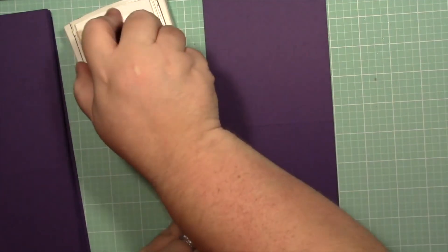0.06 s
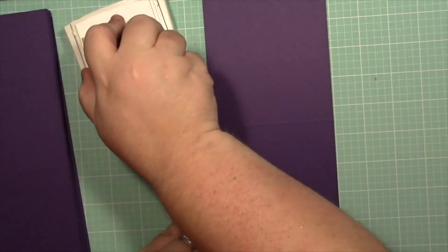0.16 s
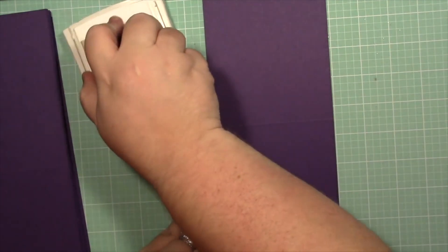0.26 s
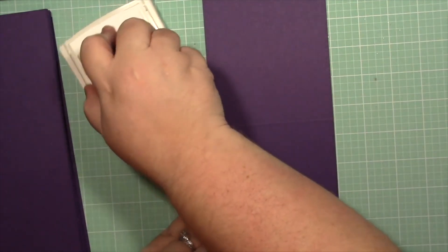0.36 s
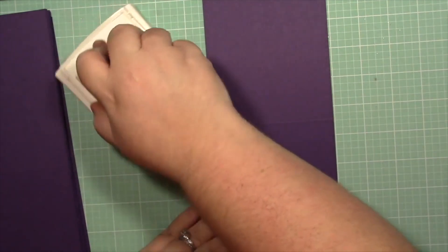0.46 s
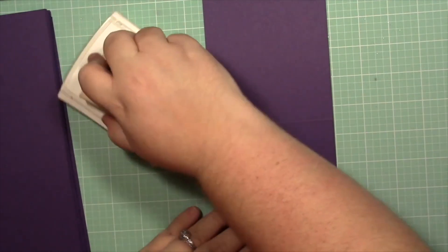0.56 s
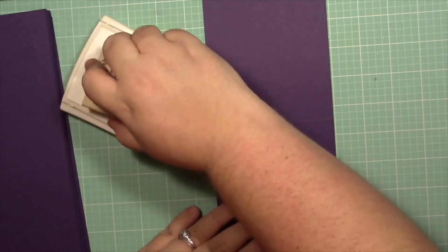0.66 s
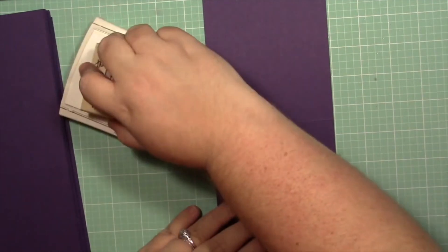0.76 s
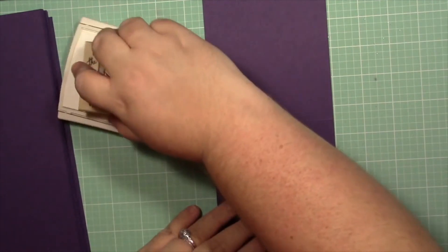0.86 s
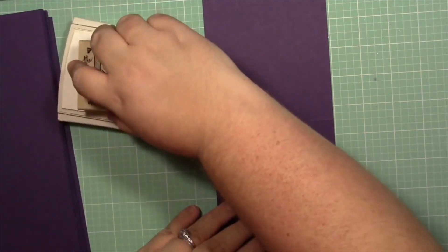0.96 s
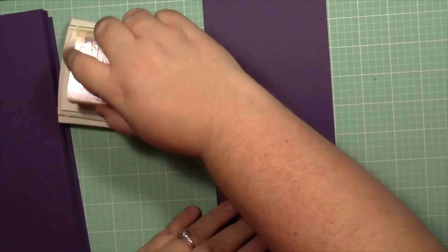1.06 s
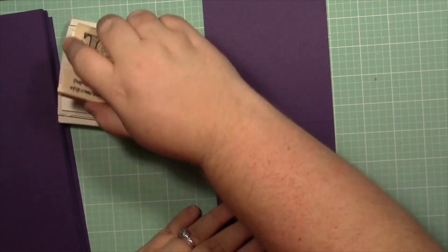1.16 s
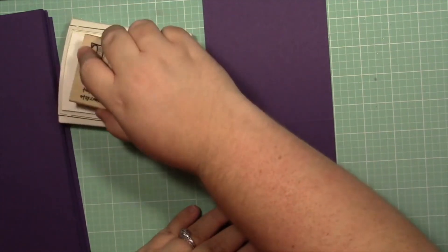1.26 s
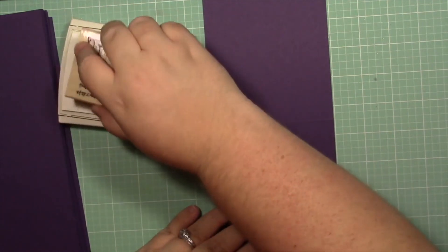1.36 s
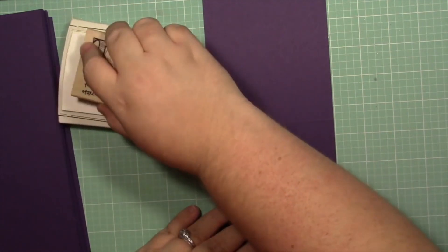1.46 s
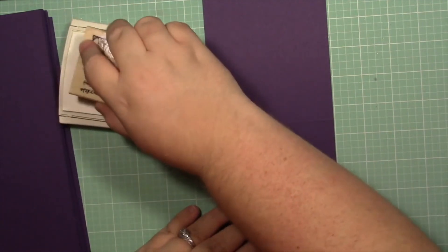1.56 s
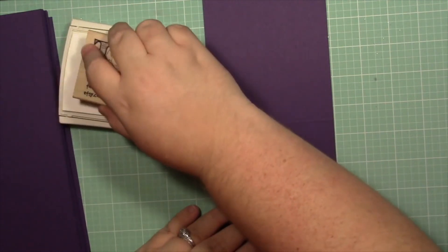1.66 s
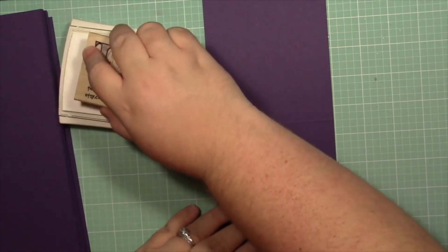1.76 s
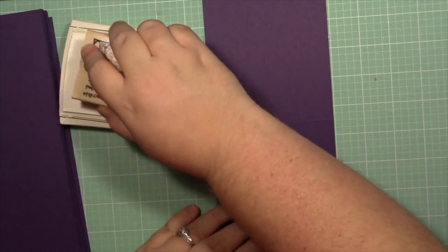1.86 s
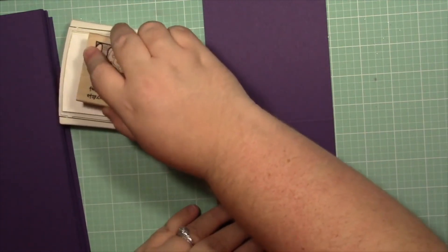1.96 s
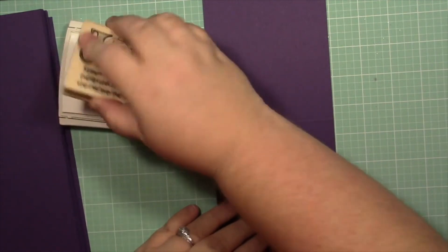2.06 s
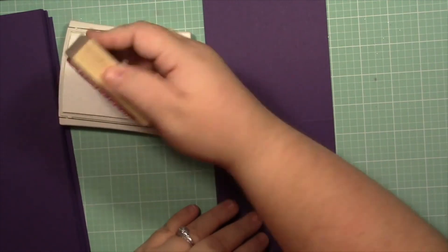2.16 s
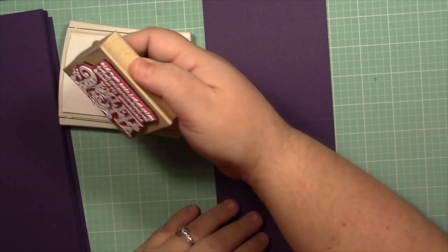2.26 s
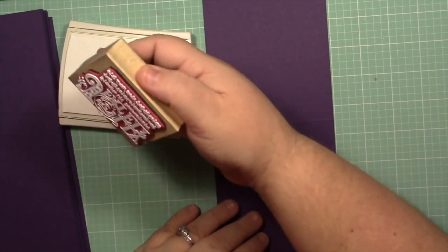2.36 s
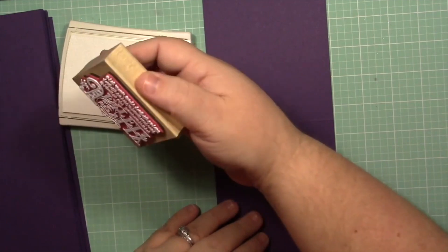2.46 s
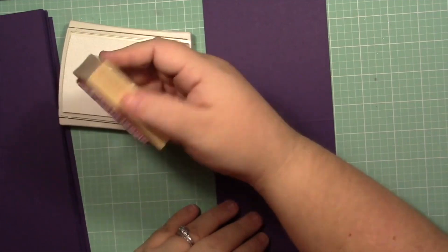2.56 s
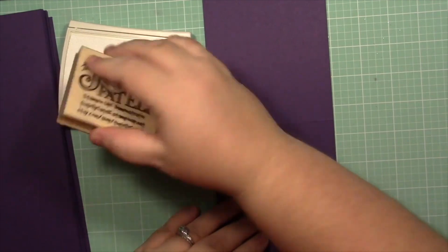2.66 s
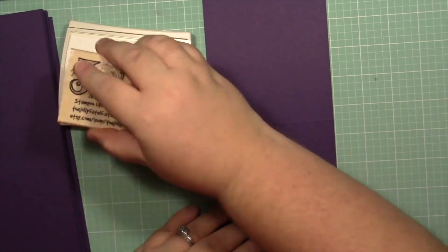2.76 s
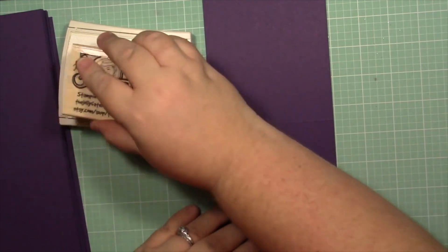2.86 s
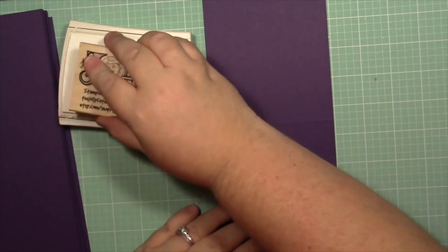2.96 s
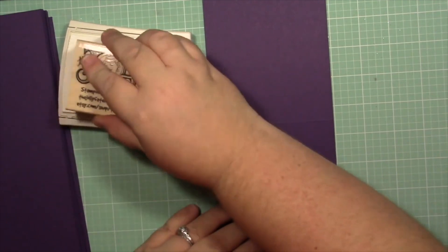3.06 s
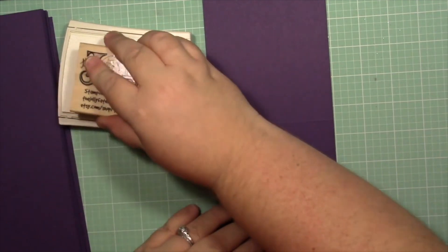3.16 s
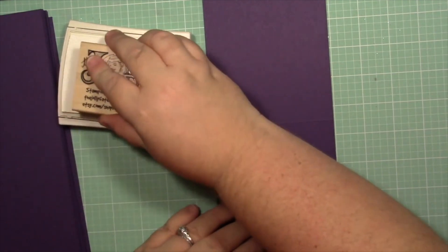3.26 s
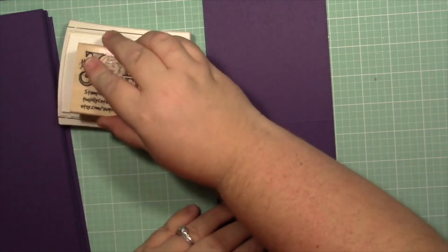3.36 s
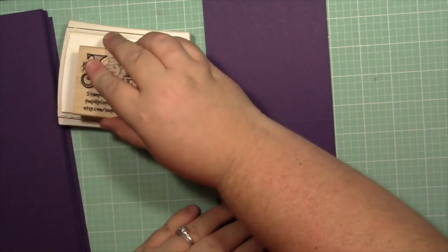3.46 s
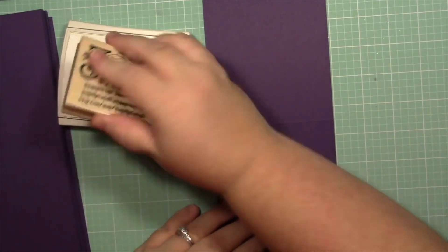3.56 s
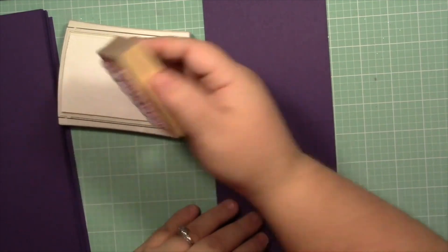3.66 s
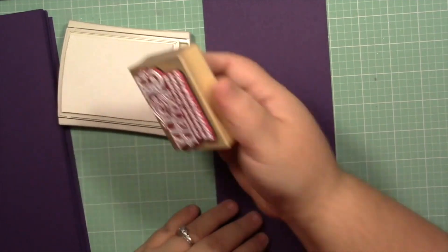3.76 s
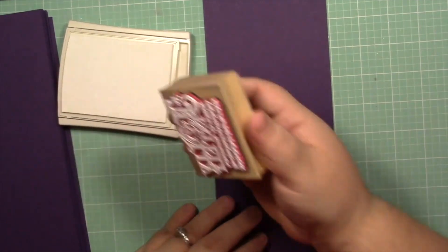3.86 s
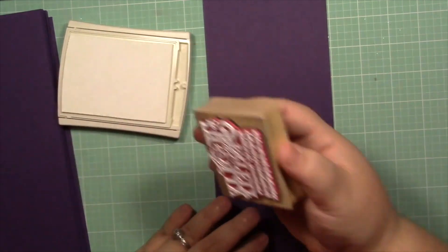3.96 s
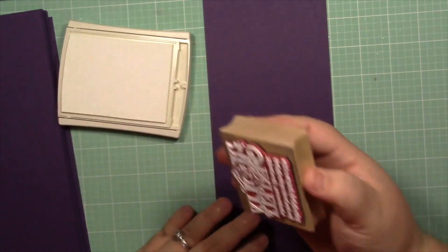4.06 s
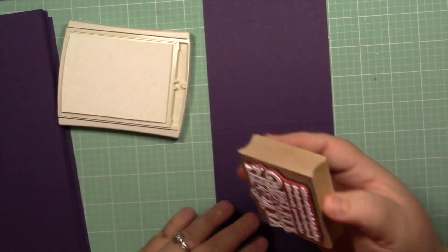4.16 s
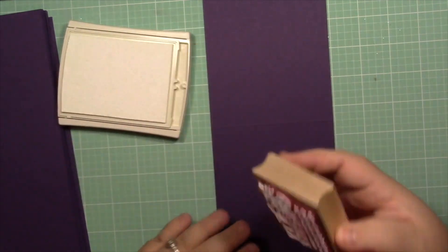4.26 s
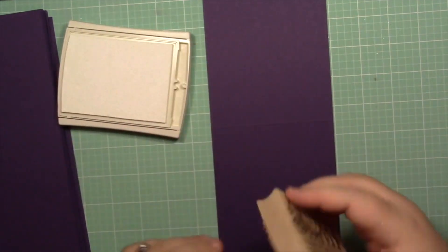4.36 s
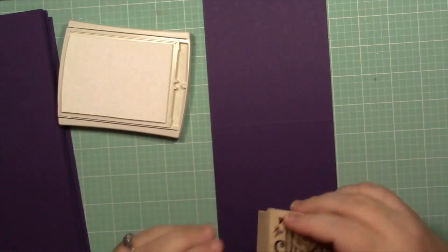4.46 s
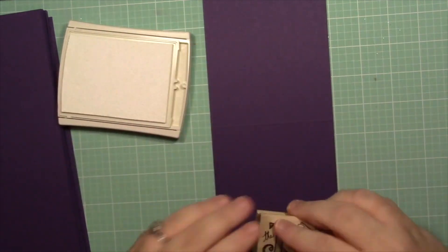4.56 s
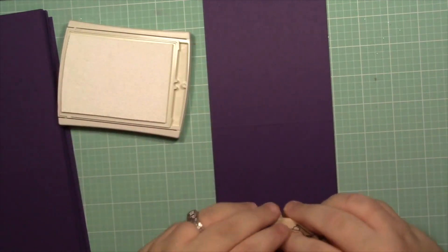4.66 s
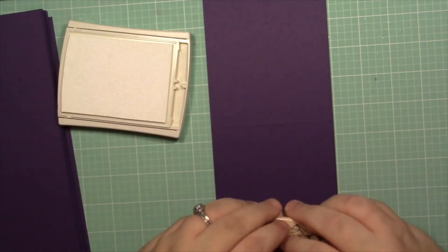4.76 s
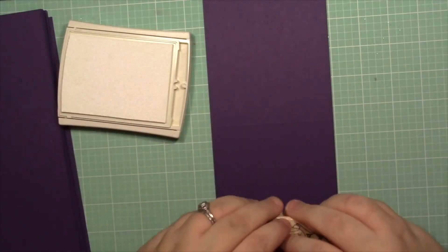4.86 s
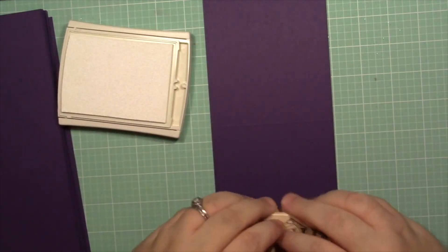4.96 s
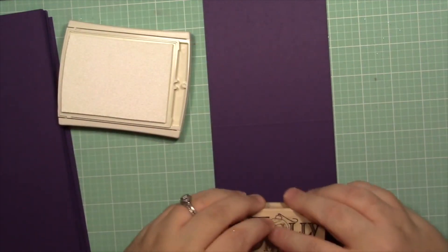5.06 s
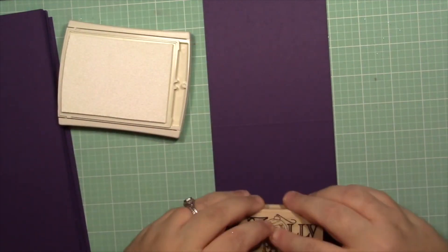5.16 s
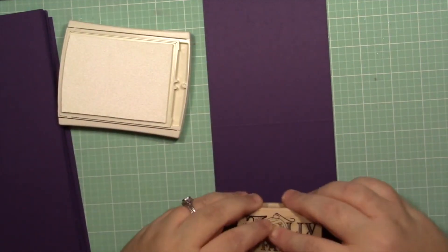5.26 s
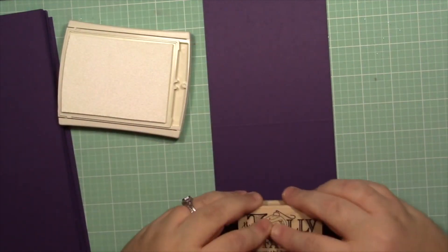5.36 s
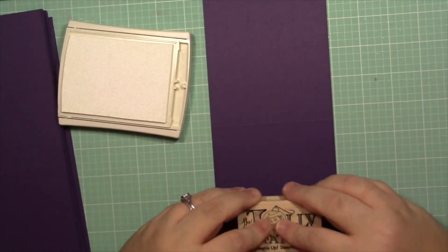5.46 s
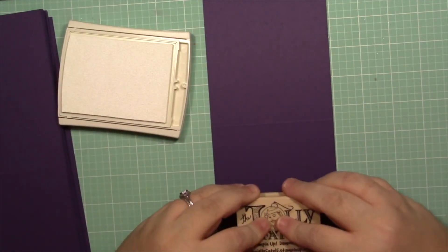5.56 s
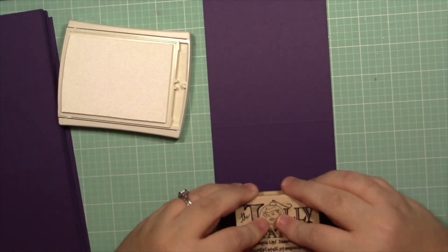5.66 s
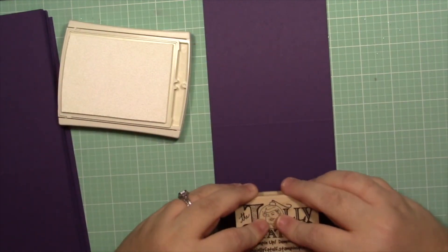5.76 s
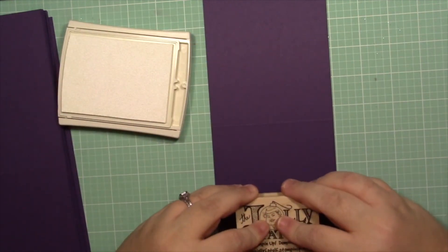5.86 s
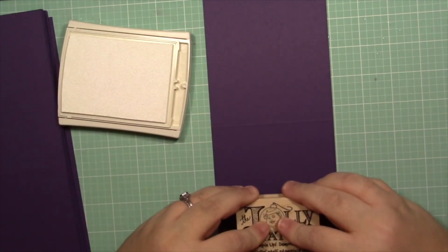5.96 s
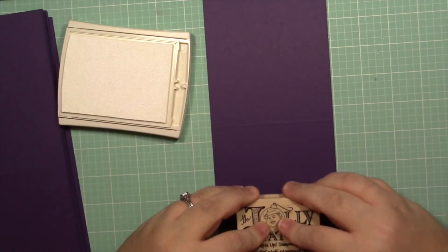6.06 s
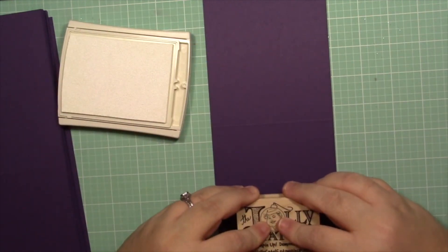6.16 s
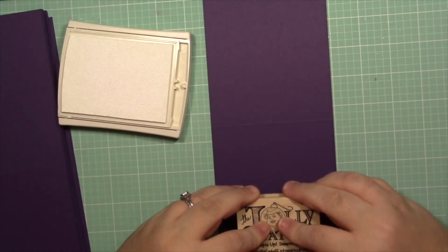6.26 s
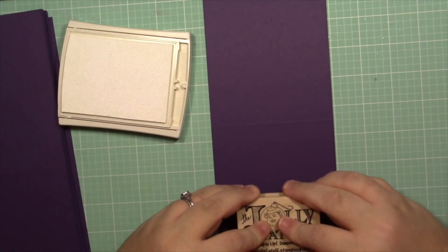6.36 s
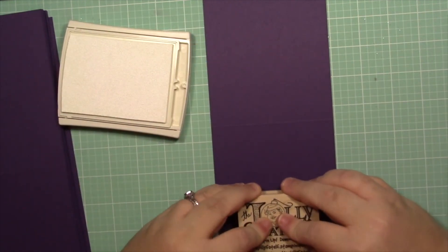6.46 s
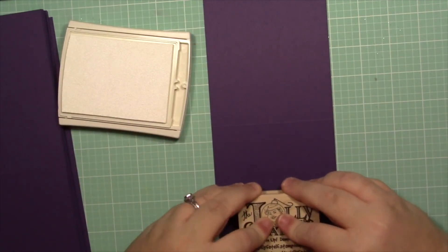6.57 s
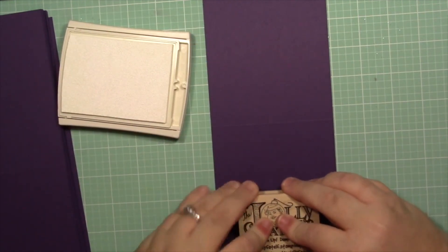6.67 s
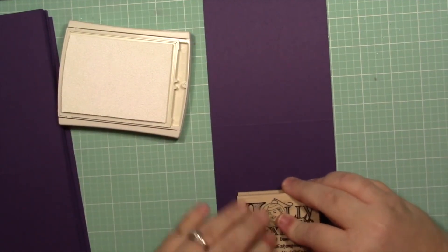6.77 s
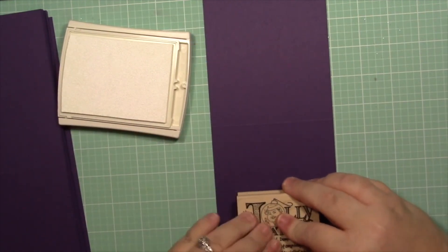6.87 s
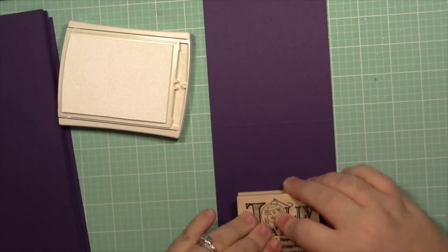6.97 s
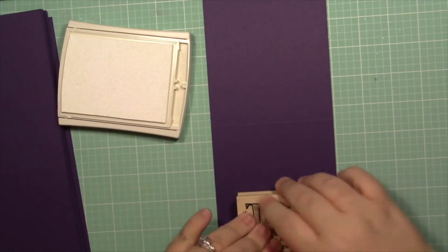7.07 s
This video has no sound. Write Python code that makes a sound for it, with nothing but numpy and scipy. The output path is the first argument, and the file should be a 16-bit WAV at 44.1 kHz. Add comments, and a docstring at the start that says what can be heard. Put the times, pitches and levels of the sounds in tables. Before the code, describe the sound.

Close above a craft table in a small room, a plastic case clacks down and scrapes along a mat. Two runs of hollow, clacking taps follow as a wooden stamp is inked on the pad. After a quieter stretch of hands rubbing card and tiny sticky snaps of rubber, the stamp knocks down solidly and rocks softly. Room tone, microphone hiss and a faint, rapid camera tick run underneath.

```python
"""A wood-mounted rubber stamp, tapped on a plastic ink pad in two bunches, then set down hard on card.
Close perspective, from a camera microphone straight above the table in a small room. Each knock rings
block, case and table, and the room answers. A low thud and a soft rush fade at the very start; the
pad's hollow case is set down and slid on the cutting mat. Later hands brush the card and the tacky
rubber crackles. Behind it all are the camera's faint ticking, room tone and microphone hiss."""
import sys
import numpy as np
from scipy import signal
from scipy.fft import rfft, irfft, next_fast_len
from scipy.io import wavfile
from scipy.ndimage import map_coordinates

SR = 44100
rng = np.random.default_rng(int(sys.argv[2]) if len(sys.argv) > 2 else 0)


def to_wav(sig):
    """Store sig (one row per channel, or 1-D mono) as 16-bit WAV at the path in sys.argv[1].

    Samples outside -1..1 are clipped; the rate is SR.
    """
    pcm = np.clip(np.atleast_2d(sig), -1, 1) * 32767
    pcm = np.round(pcm).astype(np.int16)
    wavfile.write(sys.argv[1], SR, pcm.T)  # frames by channels


N = 313551

# The pad's case set down on the mat with a double knock, then the stamp's knocks on the pad.
# Thud, clack and snap colour the bass, middle and treble:
# start_s, level_db, thud_db, clack_db, snap_db, nominal_pitch_hz
CASE_AND_STAMP_KNOCKS = [(0.145, -16.5, 12, 15, 5, 747), (0.1475, -15, 12.5, -5, -8, 740),
                         (1.256, -18, -7, 4, -0.5, 597), (1.441, -0.5, -13, 4, 4, 638),
                         (1.613, -18.5, 5.5, 10, 7.5, 626), (1.762, -1.5, -9, 3, 1, 621),
                         (1.9157, -14.5, 5, 10, 5, 657), (2.933, -13.5, -4, 5.5, 10, 589),
                         (3.117, 1, -11.5, -3, 2.5, 618), (3.265, -13.5, 3, 4, 6.5, 578),
                         (3.408, -9.5, 6, 5, 4, 550), (3.502, -25, 2, 12.5, 15.5, 656)]
# Table top, block and pad case ringing together: pitch_hz, level_db, t60_s
PAD_MODES = [ (89.5, -28.5, 0.25), (134, -27, 0.065), (207, -14.5, 0.03), (233, -20, 0.034),
             (291.3, -26.5, 0.096), (443, -9.5, 0.0061), (547, -28, 0.21), (565, 3.5, 0.017),
             (733, -14, 0.025), (933.3, -18.5, 0.063), (1128, -1.5, 0.0072), (1268, -15, 0.018),
             (1655, -11, 0.015), (2370, -23, 0.015), (2850, -19, 0.011), (3950, -19, 0.01),
             (6530, -23.5, 0.0055)]
# The crack of knocked plastic: frequency_hz, density_db
CRACK_SPECTRUM = [(300, 13.5), (1200, 6), (1700, 16.5), (2100, -9.5), (3000, 5), (4200, 4.5), (5000, -2),
                  (7000, 0), (8200, -6.5), (10800, -3.5), (13000, -22), (16000, -32)]
# The block lying flat on card and table: pitch_hz, level_db, t60_s
CARD_MODES = [(82, -38.5, 0.32), (175, -35.5, 0.08), (308, -22, 0.037), (465, -9, 0.01), (622, 1, 0.017),
              (760, -12, 0.026), (803, -18, 0.092), (1053, -20.5, 0.028), (1276, -22.5, 0.028),
              (1545, -21, 0.023)]
# Rubber slapping card: frequency_hz, density_db
SLAP_SPECTRUM = [(400, -0.5), (1400, -1), (1950, -1.5), (2650, 5), (3200, -4), (3800, -16), (4700, -11.5),
                 (5600, -16.5), (7500, -15.5), (11000, -17), (13500, -33), (16000, -40)]
# A low thud dying away at the very start; later, soft bumps of the stamp rocking:
# start_s, level_db, thud_db
SOFT_THUDS = [(0.003, -38, 26.5), (6.6914, -29.5, 7), (6.715, -34.5, 9), (6.759, -36, 13)]
# Tacky inked rubber letting go: start_s, level_db
TACKY_SNAPS = [(4.8265, -32), (4.9348, -35), (5.0402, -18.5), (5.051, -30), (5.056, -17.5), (5.067, -18),
               (6.7145, -31.5)]
# The case ticking as its load shifts: start_s, level_db
PLASTIC_TICKS = [(0.0376, -18.5), (1.0226, -29), (1.2535, -29), (1.336, -20), (2.0075, -24.5),
                 (3.0265, -26), (3.3402, -19), (3.4945, -16.5)]
# The case shoved over the mat: peak_s, level_db, swell_s, fade_s
CASE_SHOVES = [(0.295, -46, 0.019, 0.33), (0.44, -37.5, 0.26, 0.25), (0.576, -40.5, 0.08, 0.1),
               (0.69, -47, 0.14, 0.076), (0.895, -39.5, 0.19, 0.12), (1.01, -49.5, 0.09, 0.18)]
# Resonances of the hollow case: pitch_hz, width_hz, level_db
SHELL_MODES = [(570, 160, -11.5), (950, 23, 1), (1200, 18, -11), (1747, 154, 6.5), (2360, 230, -2),
               (3640, 260, -14), (5700, 200, -15)]
# Plastic scraping the mat: frequency_hz, density_db
SCRAPE_SPECTRUM = [(60, -55), (200, -21), (450, -3), (620, 4.5), (1400, -5.5), (2500, -30), (3200, -19),
                   (6000, -22.5), (9000, -25.5), (15000, -41)]
# A soft mid-range rush fading at the very start; later, fingers shifting on the block:
# peak_s, level_db, swell_s, fade_s
RUSH_AND_GRIPS = [(0.01, -50, 0.079, 0.24), (4.01, -49.5, 0.029, 0.082), (4.94, -54.5, 0.034, .13),
                  (5.03, -54.5, 0.056, 0.16), (6.02, -52.5, 0.077, 0.13), (7.01, -51.5, 0.11, 0.3)]
# Hands and arms brushing the card: peak_s, level_db, swell_s, fade_s
CARD_BRUSHES = [(3.78, -61.5, 0.24, 1.6), (4.34, -61.5, 1, 1.2), (6.63, -56.5, .04, 0.36)]
# Dull rub: frequency_hz, density_db
RUB_SPECTRUM = [(50, -54), (200, -11.5), (400, -11), (520, -2.5), (900, -10.5), (1600, -11.5), (2500, -24),
                (6000, -63)]
# Brushing hiss: frequency_hz, density_db
SWISH_SPECTRUM = [(300, -40), (900, 1), (2000, 6), (3500, 5), (6000, -1), (10000, -6), (13000, -7.5),
                  (16000, -25)]
# Decay of the small room: frequency_hz, t60_s
ROOM_DECAY = [(100, 0.14), (300, 0.52), (600, .38), (1000, 0.38), (4000, 0.43), (12000, 0.33)]
# Colour of the room's tail: frequency_hz, gain_db
ROOM_COLOUR = [(80, 0), (180, 6), (300, 4), (450, -4.5), (610, -6), (950, 0), (1500, -2.5), (2100, -2),
               (2900, -3), (4000, -5), (5000, 2), (6700, -4), (12000, -5.5)]
# Room tone and microphone hiss, centre: frequency_hz, density_db
AIR_SPECTRUM = [(15, -63), (25, -24.5), (64, -14.5), (108, -4), (180, -1), (263, -3), (394, -1.5),
                (560, -5.5), (695, -7), (911, -8), (2110, -15), (2690, -17.5), (3250, -17.5),
                (11300, -28.5), (16000, -38)]
# Room tone that differs between left and right: frequency_hz, density_db
SIDE_SPECTRUM = [(15, -47), (25, -18), (262, -0.5), (797, -6), (1340, -12.5), (2240, -13.5), (4500, -39),
                 (6620, -51), (12000, -50), (15600, -67), (22000, -120)]


def case_and_stamp_knocks(touch_hz=686, touch_s=0.0016, lead_s=0.0029, hard_top_hz=12500):
    """Case on mat, then stamp on pad: a soft first touch, then ringing modes under a plastic crack."""
    out, t = np.zeros(N), np.arange(SR // 2) / SR
    for start_s, db, thud_db, clack_db, snap_db, nominal_hz in CASE_AND_STAMP_KNOCKS:
        tilt = [(250, thud_db), (450, 0), (750, 0),
                (1000, clack_db), (1700, clack_db - 6), (2500, snap_db)]
        body = ring(PAD_MODES, t, tilt, rise_s=0.0015, scatter_db=1.8, pitch=(nominal_hz / 600) ** 1.28)
        top_hz = hard_top_hz * 2 ** (db / 12)  # a blow 12 dB softer is an octave duller
        crack = amp(snap_db - 0.5) * burst(CRACK_SPECTRUM, t, t60_s=0.028)
        crack = filtered(crack, lambda hz: 1 / np.hypot(1, (hz / top_hz) ** 2))
        add(out, start_s, in_room(amp(db) * (body + crack)))
        press = (t / touch_s) ** 2
        touch = np.sin(2 * np.pi * touch_hz * t) * press * np.exp(-press)
        add(out, start_s - lead_s, amp(-15.5 + db / 2) * touch)
    return out


def stamp_on_card(start_s=6.4355, level_db=4, slap_db=-7):
    """The stamp lands flat on the card: one firm, dark knock into the table."""
    out, t = np.zeros(N), np.arange(SR // 2) / SR
    body = ring(CARD_MODES, t, tilt=[(600, 0)], rise_s=0.0011, scatter_db=0.4)
    slap = amp(slap_db) * burst(SLAP_SPECTRUM, t, t60_s=0.017)
    add(out, start_s, in_room(amp(level_db) * (body + slap)))
    return out


def soft_thuds():
    """The opening low thud and, later, the rocking stamp sound mostly in the table's low modes."""
    out, t = np.zeros(N), np.arange(SR // 2) / SR
    for start_s, db, thud_db in SOFT_THUDS:
        tilt = [(200, thud_db), (600, -4), (1500, -15)]
        bump = ring(CARD_MODES, t, tilt, rise_s=0.0011, scatter_db=1.5)
        add(out, start_s, in_room(amp(db) * bump, tail_gain_db=-29.5))
    return out


def clicks(events, centre_hz, t60_s, octave_below_db):
    """Plastic or tacky rubber lets go in tiny snaps, each a burst of noise round one pitch."""
    out, t = np.zeros(N), np.arange(SR // 4) / SR
    hump = [(centre_hz / 8, -25), (centre_hz / 2, octave_below_db), (centre_hz, 0),
            (centre_hz * 2, -14), (centre_hz * 4, -30)]
    for start_s, db in events:
        snap = coloured(burst(hump, t, t60_s), [(12500, -5), (16000, -16)])
        add(out, start_s, in_room(amp(db) * snap))
    return out


def case_slide(scrape_db=-3, flutter_db=1.3):
    """The case catches and slips on the mat; the harder the push, the more its hollow shell rings."""
    def shell_response(hz):
        modes = sum(amp(db) * resonance(hz, centre, width) for centre, width, db in SHELL_MODES)
        return modes / (1 + (hz / 5000) ** 2)

    push = strokes(CASE_SHOVES)
    shell = unit(filtered(rng.standard_normal(N), shell_response))
    shell_share = (push / push.max()) ** 0.58
    friction = shell_share * shell + amp(scrape_db) * noise(SCRAPE_SPECTRUM)
    return friction * push * amp(flutter_db * wobble(rate_hz=140))


def rush_and_hands(brush_rub_db=-0.5, dull_swish_db=-11.5, grain_db=1):
    """A soft opening rush; later, skin rubs the block and brushes the card with a grainy hiss."""
    dull, brush = strokes(RUSH_AND_GRIPS), strokes(CARD_BRUSHES)
    rub = (dull + amp(brush_rub_db) * brush) * noise(RUB_SPECTRUM)
    swish = (brush + amp(dull_swish_db) * dull) * noise(SWISH_SPECTRUM)
    return (rub + swish) * amp(grain_db * wobble(rate_hz=62))


def rubber_squeak(peak_s=4.87, level_db=-69, ramp_s=0.28, pitch_hz=8400, width_hz=220):
    """Pressed rubber creeps over the card with a thin, faint whistle."""
    whistle = filtered(rng.standard_normal(N), lambda hz: resonance(hz, pitch_hz, width_hz))
    return strokes([(peak_s, level_db, ramp_s, ramp_s)]) * unit(whistle)


def camera_ticks(level_db=-50, pitch_hz=2050, width_s=0.0011, frame_rate_hz=29.97):
    """Right by the microphone, the camera's drive ticks softly on every second frame."""
    out, t = np.zeros(N), np.arange(-SR // 200, SR // 200) / SR
    envelope = np.exp(-(t / width_s) ** 2)
    for start_s in np.arange(0.0305, N / SR, 2 / frame_rate_hz):
        size, detune, offset = rng.standard_normal(3)
        phase = 2 * np.pi * pitch_hz * (1 + 0.025 * detune) * t + np.pi * offset
        tone = np.sin(phase) + 0.17 * np.sin(2 * phase)
        add(out, start_s, amp(level_db + 0.5 * size) * envelope * tone)
    return out


def in_room(dry, tail_gain_db=-37.5, delay_s=0.0066, build_s=0.00076, wall_s=0.014, wall_db=-19):
    """The microphone hears the direct sound, a dull echo off the nearest wall, and the room's tail."""
    hz, t, spectra = signal.stft(rng.standard_normal(SR // 2), SR, nperseg=256)
    decay = amp(-60 * t / along(ROOM_DECAY, hz)[:, None])
    tail = coloured(signal.istft(spectra * decay, SR, nperseg=256)[1], ROOM_COLOUR)
    age_s = np.maximum(np.arange(len(tail)) / SR - delay_s, 0)
    tail *= 1 - np.exp(-age_s / build_s)
    echo = filtered(dry, lambda f: amp(wall_db) * np.exp(-2j * np.pi * f * wall_s) / (1 + 1j * f / 4000))
    return dry + echo + amp(tail_gain_db) * signal.fftconvolve(dry, tail)[:len(dry)]


def room_tone(mid_db=-58, side_db=-64):
    """Steady room air and microphone hiss, as mid and side."""
    return amp(mid_db) * noise(AIR_SPECTRUM), amp(side_db) * noise(SIDE_SPECTRUM)


def ring(modes, t, tilt, rise_s, scatter_db, pitch=1):
    """Struck modes swell, the low ones last, and die away; pitch shifts only the damped block modes."""
    hz, db, t60_s = np.transpose(modes)
    is_block = (hz > 400) & (hz < 800) & (t60_s < 0.06)
    hz = np.where(is_block, hz * pitch, hz)
    gain = amp(db + along(tilt, hz) + scatter_db * rng.standard_normal(len(hz)))
    mode_rise_s = rise_s * (600 / hz[:, None]) ** 0.43
    swell = 1 - np.exp(-(t / mode_rise_s) ** 2)
    decay = amp(-60 * t / t60_s[:, None])
    polarity = (-1) ** np.arange(len(hz))
    return (polarity * gain) @ (np.sin(2 * np.pi * hz[:, None] * t) * decay * swell)


def burst(spectrum, t, t60_s):
    """A short contact noise of energy 1: many tiny touches, with a smooth spectrum."""
    fade = amp(-60 * t / t60_s)
    bins = rfft(rng.standard_normal(len(t)) * fade)
    colour = amp(along(spectrum, np.fft.rfftfreq(len(t), 1 / SR)))
    touches = irfft(bins / np.abs(bins) * colour, len(t)) * np.sqrt(fade)
    return touches / np.linalg.norm(touches)


def strokes(rows, range_db=22):
    """Gain of a series of strokes: each rises range_db over its swell and falls as much over its fade."""
    t = np.arange(N) / SR
    gains = [amp(db - range_db * np.maximum((peak_s - t) / swell_s, (t - peak_s) / fade_s))
             for peak_s, db, swell_s, fade_s in rows]
    return np.linalg.norm(gains, axis=0) + 1e-9


def amp(db):
    return 10 ** (np.asarray(db) / 20)


def unit(x):
    return x / np.sqrt(np.mean(x ** 2) + 1e-20)


def along(points, hz):
    """Interpolate (frequency_hz, value) points on a log frequency axis."""
    point_hz, values = np.transpose(points)
    return np.interp(np.log(hz + 1), np.log(point_hz + 1), values)


def wobble(rate_hz):
    """A smooth random curve with rate_hz knots a second."""
    knots = rng.standard_normal(int(N * rate_hz / SR) + 4)
    return map_coordinates(knots, [np.arange(N) * rate_hz / SR])


def filtered(x, response):
    """Pass x through a frequency response."""
    length = x.shape[-1]
    padded = next_fast_len(length + SR // 8)
    return irfft(rfft(x, padded) * response(np.fft.rfftfreq(padded, 1 / SR)), padded)[..., :length]


def coloured(x, curve):
    """Equalise x by (frequency_hz, gain_db) points."""
    return filtered(x, lambda hz: amp(along(curve, hz)))


def noise(spectrum):
    """Coloured noise of rms 1."""
    return unit(coloured(rng.standard_normal(N), spectrum))


def resonance(hz, centre, width):
    """Response of one damped resonance."""
    return 1j * hz * width / (centre ** 2 - hz ** 2 + 1j * hz * width)


def add(track, start_s, sound):
    """Mix a sound into the track."""
    start = max(round(start_s * SR), 0)
    track[start:start + len(sound)] += sound[:max(len(track) - start, 0)]


def scene():
    """The work lies straight under the microphone; only room tone and hiss have some width."""
    plastic = clicks(PLASTIC_TICKS, centre_hz=6500, t60_s=0.047, octave_below_db=-4)
    rubber = clicks(TACKY_SNAPS, centre_hz=10500, t60_s=0.014, octave_below_db=-13)
    knocks = case_and_stamp_knocks() + stamp_on_card() + soft_thuds()
    friction = case_slide() + rush_and_hands() + rubber_squeak()
    centre = knocks + plastic + rubber + friction + camera_ticks()
    air, side = room_tone()
    return np.array([centre + air + side, centre + air - side])


def record(dry, low_cut_hz=62, top_hz=15850):
    """The camera drops the deep bass and keeps nothing above its band limit."""
    low_cut = signal.butter(2, low_cut_hz, "highpass", fs=SR, output="sos")
    return filtered(signal.sosfilt(low_cut, dry), lambda hz: hz < top_hz)


dry = scene()
out = record(dry)
to_wav(out)
```